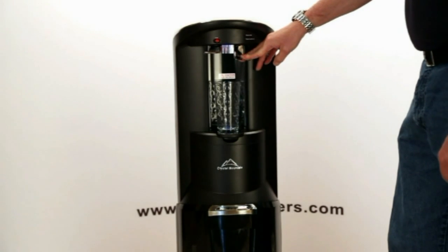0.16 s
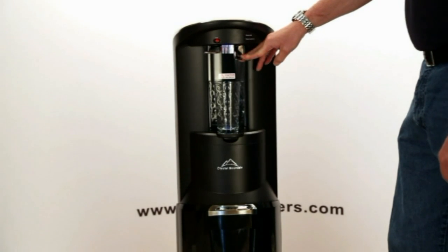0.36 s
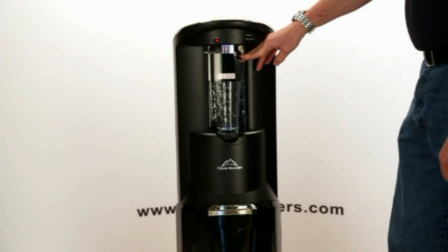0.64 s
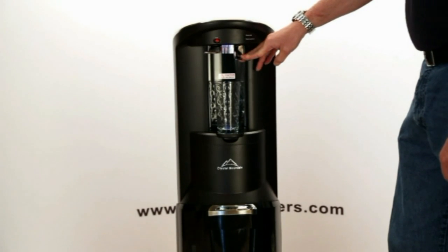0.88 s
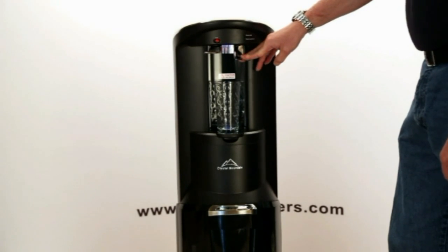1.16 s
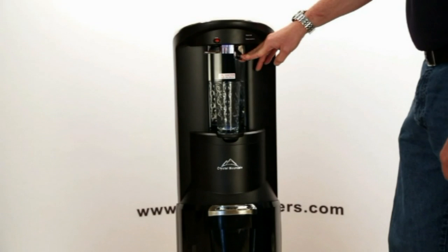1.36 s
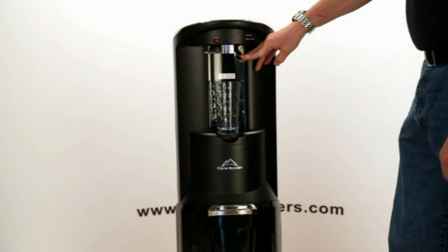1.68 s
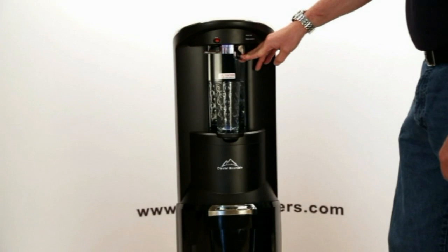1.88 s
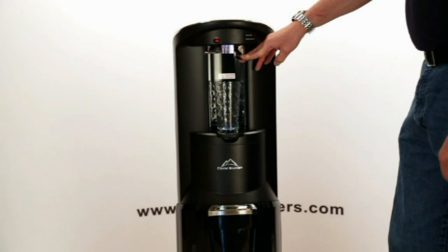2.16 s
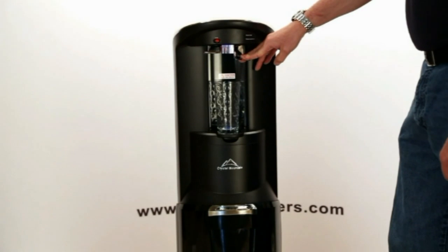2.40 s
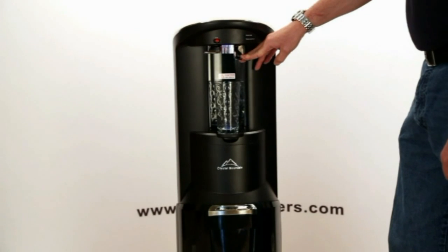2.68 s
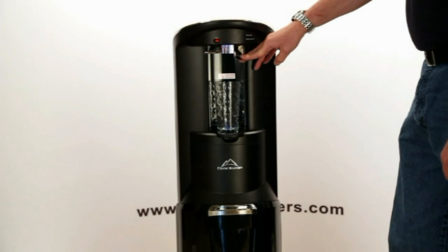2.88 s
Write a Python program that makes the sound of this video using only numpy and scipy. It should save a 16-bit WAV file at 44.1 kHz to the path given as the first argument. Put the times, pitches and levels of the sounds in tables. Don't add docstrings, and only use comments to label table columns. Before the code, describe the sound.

Steady buzzing motor hum of a water dispenser, with faint hissing, fizzing water and small splashes

```python
import sys
import numpy as np
from scipy import signal
from scipy.fft import rfft, irfft
from scipy.io import wavfile
from scipy.ndimage import uniform_filter1d

SR = 44100
rng = np.random.default_rng(int(sys.argv[2]) if len(sys.argv) > 2 else 0)


def int16_out(signal):
    q = np.round(np.clip(np.atleast_2d(signal).T, -1, 1) * 32767)
    wavfile.write(sys.argv[1], SR, q.astype(np.int16))


def to_linear_factor(level_db):
    exponent = np.asarray(level_db, float) / 20
    return 10 ** exponent


N = 134064

# frequency [Hz], density [dB per Hz].
AIR_SPECTRUM = [(22, -20), (45, 2.5), (70, -1), (100, 8), (120, 2.5), (150, 8.5)]
# frequency [Hz], density [dB per Hz].
STREAM_SPECTRUM = [(1500, -5), (2330, -0.5), (2800, -8), (4050, -12.5), (4250, -15.5), (8400, -20.5),
                   (12500, -22.5), (14300, -16.5)]
# start [s], peak level [dB].
SPLASHES = [(0.0984, -43), (0.318, -42), (0.379, -51), (0.4863, -42), (0.738, -40), (0.7761, -34.5),
            (1.1373, -35), (1.16, -44), (1.213, -46), (1.76, -43), (1.8856, -40), (2.05, -45),
            (2.1505, -46), (2.5194, -53), (2.9537, -39)]
# frequency [Hz], level [dB].
SPRAY_SPECTRUM = [(1500, -8), (3600, 0), (6000, -5), (7000, -22)]
# frequency [Hz], density [dB per Hz].
CABINET_SPECTRUM = [(150, -23), (175, -9.5), (240, -4.5), (530, -4), (585, 0), (720, -2), (900, -0.5),
                    (1050, -7.5)]
# frequency [Hz], density [dB per Hz].
HOUSING_SPECTRUM = [(1000, -9.5), (1200, -3), (1290, -1), (1400, -4.5), (1500, -12)]
# frequency [Hz], width [Hz], level [dB].
PANEL_RINGS = [(257.6, 22, -48.5), (356.8, 12, -50.5), (616, 51, -48)]
# multiple of shaft speed, level [dB].
HUM_LINES = [(1, -44), (2, -42), (3, -28.5), (4, -31.5), (5, -30.5), (6, -32.5), (7, -2), (8, 0), (9, -15),
             (10, -9.5), (11, 0), (12, -6), (13, -11), (14, -11.5), (15, -2), (16, -14), (17, -24),
             (18, -12), (19, -21), (20, -16), (21, -10.5), (22, -6.5), (23, -22), (24, -14), (25, -20),
             (26, -18), (27, -19), (28, -15), (29, -26), (30, -14), (31, -21), (32, -20), (33, -17),
             (34, -22), (35, -17), (36, -28)]
PANEL_LEAD = [(1, -.4), (11, 2.6), (12, 1.9), (13, 4.3), (14, .2), (15, .4), (22, .1)]
# frequency [Hz], level [dB].
LOOSE_TONES = [(119.5, -56), (1085.1, -51.5), (1223.8, -47), (1412, -56.5), (1903.7, -69.5), (1972.3, -58),
               (2447.7, -61.5)]
WHINE_CANCELS = [-.1, .33, .72, 1.09, 1.46, 1.80, 2.02, 2.28, 2.51, 2.78, 3.06]
# frequency [Hz], side minus mid [dB].
STEREO_WIDTH = [(25, -21), (70, -17), (250, -55), (700, -45), (1300, -35.5), (2000, -29.5), (4500, -13.5),
                (6800, -10), (6950, -40)]
# frequency [Hz], threshold over local level [dB].
TREBLE_FLOOR = [(4000, -18), (7000, -7.5), (8500, -3), (11000, 1), (12500, 3.5), (13800, 5.5), (14250, 8.5)]


def level(x, db):
    return x * to_linear_factor(db) / np.sqrt(np.mean(x ** 2))


def walk(rate):
    hold = int(SR / rate)
    steps = np.repeat(rng.standard_normal(N // hold + 1), hold)
    return 1.05 * uniform_filter1d(uniform_filter1d(steps, hold), hold)[:N]


def colour(x, table):
    hz, db = np.array(table, float).T
    log_hz = np.log(np.arange(N // 2 + 1) * SR / N + 1e-3)
    below = np.maximum(np.log(hz[0]) - log_hz, 0)
    above = np.maximum(log_hz - np.log(hz[-1]), 0)
    gain_db = np.interp(log_hz, np.log(hz), db) - 60 * (below + above)
    return irfft(rfft(x) * to_linear_factor(gain_db), N)


def restless(table, flicker_db, rate):
    spectrum = rfft(colour(rng.standard_normal(N), table))
    place = 2 * np.log2(np.arange(len(spectrum)) * SR / N + 1)
    lowest = int(2 * np.log2(table[0][0]))
    highest = int(2 * np.log2(table[-1][0]))
    total = np.zeros(N)
    for centre in range(lowest - 1, highest + 3):
        band = irfft(spectrum * np.clip(1 - abs(place - centre), 0, 1), N)
        total += to_linear_factor(flicker_db * walk(rate)) * band
    return total


def room_air():
    return level(restless(AIR_SPECTRUM, flicker_db=3, rate=7.5), -57.5)


def stream_hiss():
    return level(restless(STREAM_SPECTRUM, flicker_db=0.7, rate=7.4), -45.5)


def fizz():
    when, pitch, size = rng.random((2500, 3)).T
    hz = 1600 * 4.5 ** pitch[:, None] ** 1.5
    cycles = hz * np.arange(512)[None] / SR
    ring = np.sin(2 * np.pi * cycles * (1 + 0.018 * cycles)) * np.exp(-cycles / 2.5)
    size_db = np.minimum(-2.5 * np.log(1 - size), 9)
    ring = ring * to_linear_factor(size_db)[:, None] * 1600 / hz
    at = (when[:, None] * N).astype(int) + np.arange(512)
    return level(np.bincount(at.ravel(), ring.ravel(), N + 512)[:N], -52)


def splashes(t):
    decay_s = 0.014
    envelope = np.zeros(N)
    for start, db in SPLASHES:
        envelope += to_linear_factor(db) * (t > start) * np.exp(-np.maximum(t - start, 0) / decay_s)
    spray = colour(rng.standard_normal(N), SPRAY_SPECTRUM)
    return level(spray, -8.5) * uniform_filter1d(envelope, size=400)


def cabinet_rumble():
    return level(restless(CABINET_SPECTRUM, flicker_db=1, rate=11.62), -37)


def housing_noise():
    return level(restless(HOUSING_SPECTRUM, flicker_db=0.59, rate=10.4), -41.5)


def panel_rings():
    f = np.arange(N // 2 + 1) * SR / N
    total = np.zeros(N)
    for hz, width, db in PANEL_RINGS:
        resonance = np.exp(-2 * ((f - hz) / width) ** 2)
        total += level(irfft(rfft(rng.standard_normal(N)) * resonance, N), db)
    return total


def shaft_hum(t):
    shaft_hz, sway_rad, sway_s, sway_top_s = 25.23, .053, 2.15, .9
    hum_db, flutter_db = -34.4, .65
    scatter_rad = .3
    turn = 2 * np.pi * shaft_hz * t + sway_rad * np.cos(2 * np.pi * (t - sway_top_s) / sway_s)
    hum = np.zeros(N)
    for k, db in HUM_LINES:
        lead = np.interp(k, *np.array(PANEL_LEAD).T)
        if k > 15:
            lead += scatter_rad * max(-7.5 - db, 0) * rng.standard_normal()
        hum += to_linear_factor(db + flutter_db * walk(3.57)) * np.cos(k * turn + lead)
    return to_linear_factor(hum_db) * hum


def loose_tones(t):
    total = np.zeros(N)
    for hz, db in LOOSE_TONES:
        total += to_linear_factor(db + 1.7 * walk(8.34)) * np.cos(2 * np.pi * hz * t + .5 * walk(3.17))
    return total


def whine(t):
    whine_hz, whine_db, second_strength = 1268.8, -35.5, .87
    beat = np.pi * np.interp(t, WHINE_CANCELS, np.arange(len(WHINE_CANCELS)))
    beat = beat + .15 * np.sin(beat) ** 2
    phase = 2 * np.pi * whine_hz * t + 0.18 * walk(4.4)
    pair = np.cos(phase + beat) - second_strength * np.cos(phase - beat)
    return pair / 2 * to_linear_factor(whine_db + 0.46 * walk(18))


def pump(t):
    return np.sqrt(2) * (shaft_hum(t) + loose_tones(t) + whine(t))


def scene():
    t = np.arange(N) / SR
    water = stream_hiss() + fizz()
    machine_noise = cabinet_rumble() + housing_noise() + panel_rings()
    noise = room_air() + water + machine_noise
    mid = pump(t) + noise + splashes(t)
    scrambled = abs(rfft(noise)) * np.exp(2j * np.pi * rng.random(N // 2 + 1))
    side = colour(irfft(scrambled, N), STEREO_WIDTH)
    return np.array([mid + side, mid - side])


def band_limit(x):
    return signal.sosfilt(signal.butter(12, 14150, fs=SR, output="sos"), x)


def record(dry):
    patch_db, top_hz = 2.4, 14240
    frames = dict(fs=SR, window="cosine", nperseg=2560, noverlap=1280)
    hz, _, z = signal.stft(dry, **frames)
    size = uniform_filter1d(abs(z.mean(axis=0)), size=2, axis=0)
    local = uniform_filter1d(size.mean(axis=1), size=21)[:, None]
    patch = rng.standard_normal((len(hz) // 16 + 1, size.shape[1]))
    patch = np.repeat(patch, 16, axis=0)[:len(hz)]
    patch = patch + np.roll(patch, 1, axis=1) + .45 * patch[0]
    floor_db = np.interp(hz, *np.array(TREBLE_FLOOR, float).T, left=-60)[:, None]
    floor_db = floor_db + patch_db * patch / np.sqrt(2)
    kept = (size > local * to_linear_factor(floor_db)) * (hz < top_hz)[:, None]
    thinned = signal.istft(z * kept, **frames)[1][:, :N]
    return band_limit(thinned)


dry = scene()
out = record(dry)
int16_out(out)
```